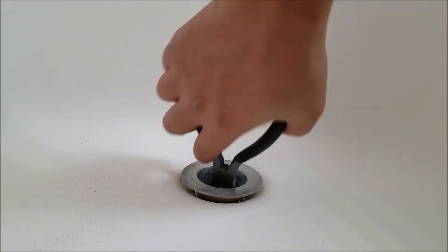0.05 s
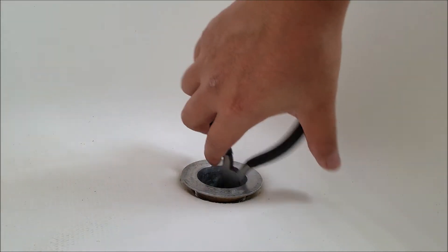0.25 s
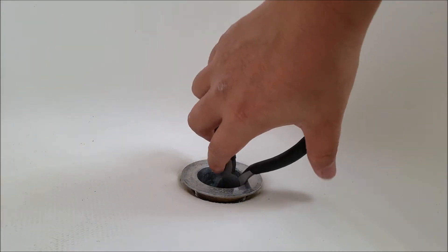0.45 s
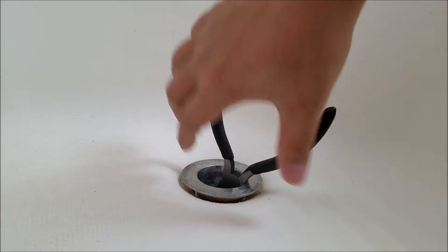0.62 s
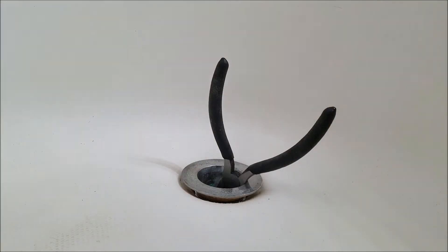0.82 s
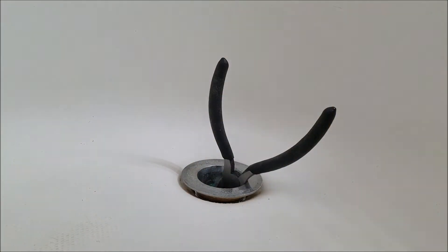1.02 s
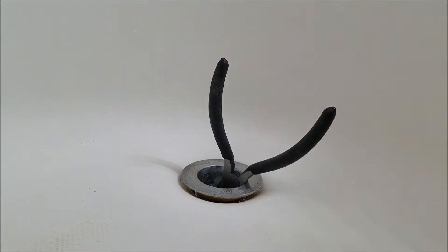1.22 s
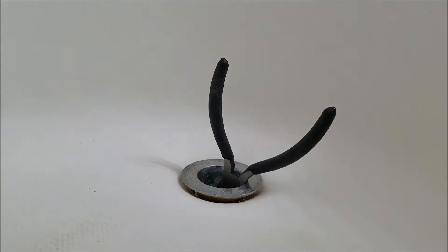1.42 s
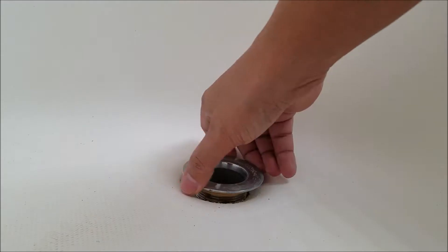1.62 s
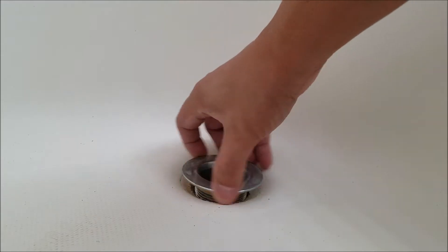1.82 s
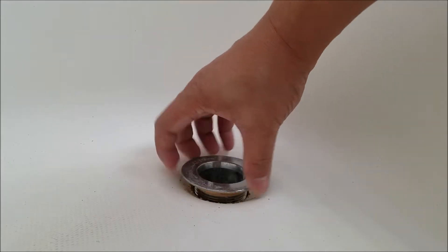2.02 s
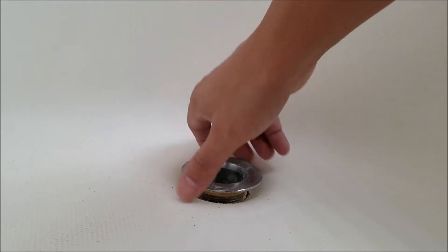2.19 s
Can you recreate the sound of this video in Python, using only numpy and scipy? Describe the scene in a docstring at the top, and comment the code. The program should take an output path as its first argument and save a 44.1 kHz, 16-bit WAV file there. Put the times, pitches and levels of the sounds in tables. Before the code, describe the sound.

Pliers clunk into a metal bathtub drain, then the loose flange scrapes softly as it turns.

```python
"""A small, hard bathroom, with a close pair of microphones at the tub. Pliers drop into the metal drain:
steel ticks and rings on steel, and each blow makes the hollow tub boom. Light taps, soft bumps and a
dull rumble follow as the hand and pliers shift. Then the hand turns the loose drain flange, whose tiny
slips in the thread scrape softly and ring pipe and tub. Behind it all, arm rustle and quiet room tone."""
import sys
import numpy as np
from scipy import signal
from scipy.fft import rfft, irfft
from scipy.io import wavfile

SR = 44100
rng = np.random.default_rng(int(sys.argv[2]) if len(sys.argv) > 2 else 0)


def unload_wav(signal):
    """Save mono or channel-first audio to the path in sys.argv[1] as 16-bit WAV at rate SR, clipped to [-1, 1]."""
    wavfile.write(
        sys.argv[1],
        SR,
        np.round(np.clip(np.atleast_2d(signal).T, -1, 1) * 32767).astype(np.int16),
    )


N = 103635

# Modes of the tub when rubbed. Each row: pitch in Hz, relative level in dB, t60 in seconds.
DRONE_MODES = [(158.2, -5, 0.37), (267.5, -2, 0.38), (342.3, -6.5, 0.22)]


def pliers(crack_s=0.0018, rise_s=0.0003):
    """Steel on steel: light contacts mostly tick, firm ones also ring the pliers and the flange."""
    # Each row: start in seconds, then level, tick's treble tilt, tick's room tail and ring trim, in dB.
    clinks = [(0.165, -37, 7, 0, -20), (0.205, -29.5, -4.5, 10.5, -6), (0.2158, -22.5, 4, 3, -18),
              (0.2362, -22.5, 1.5, 4.5, -17), (0.2421, -11, 3.5, -8, -7), (0.2554, -13.5, 0, 4, 1),
              (0.266, -0.5, -1.5, 0.5, 1), (0.2814, -19.5, -3.5, 8, -1.5), (0.3021, -13, -3.5, -4.5, 1.5),
              (0.9692, -34.5, -3, 3.5, -25)]
    # Modes of pliers and flange. Each row: pitch in Hz, relative level in dB, t60 in seconds.
    steel_modes = [(1480, -7, .02), (2130, 0, .032), (2790, 6, .028), (4620, 9, .022), (4620, -6, .15),
                   (4740, -10, .34), (4850, 2, .022), (5010, 7, .02), (5060, -10, .17), (11100, -2, .011),
                   (11600, 0, .012)]
    # Spectrum of the tick. Each row: frequency in Hz, gain in dB.
    crack_colour = [(200, -35.5), (1200, 3), (2150, -3.5), (2450, -6.5), (3100, -6), (4200, -10.5),
                    (4550, 0.5), (5000, 4.5), (5300, -4.5), (8000, -12), (9200, -11), (10000, -16),
                    (11200, -3.5), (12800, -9.5), (16000, -18)]
    out, t = np.zeros((2, N)), np.arange(SR // 2) / SR
    for s, db, tilt_db, wet_db, ring_db in clinks:
        burst = rfft(rng.standard_normal(len(t)) * t * np.exp(-2 * t / crack_s))
        crunch = irfft(burst / (abs(burst) + 1e-12), len(t))[:SR // 100]  # flattened spectrum
        crack = amp(-6) * signal.fftconvolve(crunch, impulse(crack_colour))
        tilt = impulse([(1500, -2 * tilt_db), (12000, tilt_db)], size=256)
        tick = signal.fftconvolve(crack, tilt)
        chime = amp(ring_db - 44) * ring(steel_modes, size=len(t)) * (1 - np.exp(-t / rise_s))
        add(out, s, amp(db) * bathroom(tick, wet_db))
        add(out, s, amp(db) * bathroom(chime, wet_db=-11))
    return out


def tub_knocks():
    """Each blow thuds and rings the hollow tub, some duller, some thinner."""
    # Each row: start in seconds, gain in dB, low-pass and high-pass corners in Hz, thud trim in dB.
    knocks = [(0.2099, 2.5, 347, 225, -1), (.222, 1, 1060, 850, 2), (0.2315, 10, 316, 125, -7.5),
              (0.2718, 6, 970, 68, 0.5), (0.3112, 2.5, 760, 247, -2), (.971, -18.5, 598, 69, -4)]
    # Spectrum of the thud. Each row: frequency in Hz, gain in dB.
    thud_colour = [(30, -34.5), (60, -10), (100, -9.5), (300, -13.5), (1100, -15.5), (2000, -28),
                   (4000, -16.5), (16000, -45)]
    out, ringing = np.zeros((2, N)), tub_boom()
    for s, db, top_hz, low_hz, thud_db in knocks:
        thud = bathroom(amp(4.5 + thud_db) * impulse(thud_colour), wet_db=11.5)[:, :SR]
        dulled = signal.sosfilt(signal.butter(2, top_hz, fs=SR, output="sos"), thud + ringing)
        thinned = signal.sosfilt(signal.butter(2, low_hz, "high", fs=SR, output="sos"), dulled)
        add(out, s, amp(db) * thinned)
    return out


def tub_boom(rise_s=0.0018, spread_s=0.00015):
    """Each pitch of the wide tub's boom reaches one microphone before the other, sides alternating."""
    # Pitches in the tub's boom under the quick run of blows.
    # Each row: pitch in Hz, relative level in dB, t60 in seconds.
    boom_pitches = [(98.2, -1.5, 0.47), (127.8, 3, 0.16), (164, -12.5, 0.84), (206.8, -0.5, 0.29),
                    (259, 1, 0.42), (300.6, 5, 0.11), (362.5, 0, 0.26), (402, -5.5, 0.31),
                    (523.8, -6, 0.34), (598, -10.5, 0.3), (801, -6.5, 0.2), (948.5, -1.5, 0.076)]
    t = np.arange(SR) / SR
    lead = spread_s / 2 * np.array([[-1], [1]])
    ringing = sum(amp(db - 60 * t / t60) * np.sin(2 * np.pi * hz * (t + (-1) ** k * lead))
                  for k, (hz, db, t60) in enumerate(boom_pitches))
    return amp(-37) * ringing * (1 - np.exp(-t / rise_s))


def flange(slips_per_s=3000, spread_db=2):
    """Tiny slips in the thread rasp, ring the hollow drain pipe and set the tub droning."""
    # The turn. Each row: time in seconds, then relative levels of rub, tub drone and pipe ring in dB.
    turn = [(1.57, -91.5, -80.5, -96), (1.63, -71.5, -69, -81.5), (1.69, -69.5, -64, -90),
            (1.78, -71, -63.5, -84.5), (1.855, -62.5, -58, -63.5), (1.90, -72, -53, -64.5),
            (1.955, -78.5, -53.5, -71.5), (2.0, -79, -64.5, -103), (2.05, -99, -87, -99),
            (2.21, -81.5, -69.5, -85), (2.255, -75.5, -69.5, -77.5), (2.35, -69.5, -62, -72)]
    # Spectra of the thread's rub and the tub's drone. Each row: frequency in Hz, relative level in dB.
    rub_colour = [(200, -13), (650, 5), (1100, -2.5), (2000, -4), (2750, -4), (4500, -14.5), (8000, -18),
                  (12000, -20), (16000, -23.5)]
    drone_colour = [(40, -28), (90, 5.5), (160, 5), (270, 0.5), (400, -6.5), (620, -40), (1000, -10.5),
                    (3000, -33.5)]
    # Modes of the pipe under the flange. Each row: pitch in Hz, relative level in dB, t60 in seconds.
    pipe_modes = [(541.5, -4.5, 0.13), (628, 6.5, 0.052), (792, 0, 0.053)]
    # Quick strokes of fingers and thread. Each row: middle and half width in seconds, level in dB.
    swishes = [(1.884, 0.059, -63.5), (2.258, 0.017, -69)]
    # Spectrum of their hiss. Each row: frequency in Hz, relative level in dB.
    hiss_colour = [(1000, -31), (3000, 1), (5500, 0), (8500, -6.5), (12000, -2.5), (16000, -5)]
    t = np.arange(N) / SR
    slips = (rng.random(N) < slips_per_s / SR) * rng.standard_normal(N)
    slips *= amp(spread_db * np.minimum(rng.exponential(1, N), 4))  # a few catch harder
    push = level(turn, column=2)
    rub = unit(colour(slips, rub_colour)) * level(turn)
    rumble = amp(-6.5) * unit(colour(slips, drone_colour)) * push
    drone = amp(-0.5) * resonate(unit(slips) * push, DRONE_MODES)
    pipe = resonate(unit(slips) * level(turn, column=3), pipe_modes)
    scrape = bathroom(rub + rumble + pipe, wet_db=1.5)
    strokes = sum(amp(db) * np.exp(-.5 * ((t - s) / width) ** 2) for s, width, db in swishes)
    return scrape + drone + strokes * coloured_noise(hiss_colour)


def taps():
    """Fingers and metal make damped tocks with one main pitch; the grittier ones are short scratches."""
    # Each row: start in seconds, pitch in Hz, level in dB, swell in seconds, grit from 0 to 1.
    touches = [(0.079, 975, -60, 0.0054, 0.53), (0.208, 327, -37.5, 0.0097, 0.03),
               (0.795, 408, -60.5, 0.0029, 0.28), (0.9722, 382, -48, 0.0031, .35),
               (1.079, 1296, -65, 0.0027, 0.5), (1.802, 1265, -56.5, 0.0056, 1),
               (1.931, 2600, -55.5, 0.00098, 0.82), (2.181, 4710, -70.5, 0.0027, .3)]
    out, t = np.zeros(N), np.arange(SR // 8) / SR
    for s, hz, db, swell_s, grit in touches:
        band = [(hz / 4, -35), (hz / 1.4, -14), (hz, 0), (hz * 0.96, -14), (hz * 4, -40), (SR / 2, -80)]
        scratch = np.sqrt(grit / 2) * unit(colour(rng.standard_normal(len(t)), band))
        tock = np.sqrt(1 - grit) * np.sin(2 * np.pi * hz * t)
        envelope = t / swell_s * np.exp(1 - t / swell_s)
        add(out, s, amp(db) * envelope * (tock + scratch))
    return bathroom(out, wet_db=-1)


def presses(rise_s=0.0058, t60_s=0.42):
    """Low, round bumps of a hand leaning on the tub or rocking the flange."""
    # Each row: start in seconds, pitch in Hz, level in dB.
    bumps = [(0.801, 206, -58), (0.9834, 83, -49.5), (1.9653, 148, -41), (1.9963, 142.2, -43.5)]
    out, t = np.zeros(N), np.arange(SR // 4) / SR
    rise = t / rise_s
    swell = rise * np.exp(1 - rise)
    tail = amp(-8 - 60 * t / t60_s) * np.minimum(rise, 1)
    for s, hz, db in bumps:
        add(out, s, amp(db) * (swell + tail) * np.sin(2 * np.pi * hz * t))
    return out


def shifting():
    """Dull friction of the hand and the settling pliers makes the tub rumble."""
    # Strength of the friction. Each row: time in seconds, relative level in dB.
    friction = [(0, -71), (.06, -62), (.105, -48), (.135, -56), (.18, -55), (.47, -73), (.52, -52.5),
                (.56, -54.5), (.62, -77), (.96, -83.5), (.985, -52), (1.07, -61), (1.12, -58),
                (1.18, -56.5), (1.24, -69.5), (1.33, -90.5)]
    # Spectrum of the rumble. Each row: frequency in Hz, relative level in dB.
    rumble_colour = [(30, -12), (60, -19), (90, 3), (120, -8.5), (158, 2.5), (215, 4), (265, 4), (320, -13),
                     (450, -16.5), (700, -17), (1500, -36), (5000, -56)]
    force = level(friction)
    drone = resonate(force * rng.standard_normal(N), DRONE_MODES)
    return amp(-0.5) * force * coloured_noise(rumble_colour) + amp(-6) * drone


def background():
    """Quiet room tone and the soft rustle of the moving arm."""
    # The arm's rustle. Each row: time in seconds, level in dB.
    rustle = [(0, -69), (.18, -74), (.54, -65.5), (.77, -74.5), (.83, -71), (.98, -65.5), (1.12, -65.5),
              (1.24, -74.5), (1.5, -100)]
    # Spectra of room tone and rustle. Each row: frequency in Hz, relative level in dB.
    room_colour = [(20, -21.5), (40, -5.5), (90, -2), (160, -16.5), (500, -20.5), (900, -24), (4000, -32),
                   (7000, -39), (10000, -38.5), (15500, -30)]
    rustle_colour = [(100, 12.5), (600, -2.5), (1500, -5.5), (3200, -7), (7000, -16), (11000, -14.5),
                     (16000, -14)]
    return amp(-68) * coloured_noise(room_colour) + level(rustle) * coloured_noise(rustle_colour)


def bathroom(x, wet_db, build_s=0.0023):
    """Close reflections, then a diffuse tail that dies faster in the treble."""
    # Decay of the room. Each row: frequency in Hz, t60 in seconds.
    decay = [(80, 0.6), (250, 0.63), (700, 0.37), (2000, 0.37), (5000, 0.35), (14000, 0.21)]
    # Direct sound and reflections off the tub walls. Each row: delay in seconds, left gain, right gain.
    paths = [(0, 0.64, 1), (.0017, 0.052, 0.12), (.0039, 0.33, 0.04)]
    hz, t, spectra = signal.stft(diffuse_noise(SR), SR, nperseg=256)
    response = signal.istft(spectra * amp(-60 * t / read(decay, hz)[:, None]), SR)[1]
    response *= 1 - np.exp(-np.arange(response.shape[1]) / SR / build_s)
    response *= amp(wet_db) / np.linalg.norm(response[0])
    for s, left, right in paths:
        add(response, s, np.array([[left], [right]]))
    return signal.fftconvolve(x[None], response, axes=1)[:, :N]


def diffuse_noise(size):
    """Diffuse noise at two close microphones, nearly alike in the bass."""
    # Each row: frequency in Hz, left-right correlation.
    correlation = [(30, 0.95), (200, 0.93), (400, 0.23), (800, 0.067), (1400, -0.14), (14000, -0.096)]
    a, b = rfft(rng.standard_normal((2, size)))
    alike = read(correlation, np.fft.rfftfreq(size, 1 / SR))
    mid, side = a * np.sqrt((1 + alike) / 2), b * np.sqrt((1 - alike) / 2)
    return irfft(np.array([mid + side, mid - side]), size)


def coloured_noise(points):
    """Diffuse noise with the given spectrum, at rms 1."""
    return unit(colour(diffuse_noise(N), points))


def ring(modes, size=SR):
    """Dying sines of a struck object."""
    t = np.arange(size) / SR
    return sum(amp(db - 60 * t / t60) * np.sin(2 * np.pi * hz * t) for hz, db, t60 in modes)


def resonate(force, modes):
    """A continuous force drives an object's modes."""
    response = ring(modes)
    return signal.fftconvolve(force, response / np.linalg.norm(response))[:N]


def impulse(points, size=4096):
    """A causal click with the given spectrum."""
    log_gain = np.log(amp(read(points, abs(np.fft.fftfreq(size, 1 / SR)))))
    minimum_phase = np.exp(np.conj(signal.hilbert(log_gain)))
    return np.fft.ifft(minimum_phase).real[:size // 2]


def colour(x, points):
    """Filters by a spectrum."""
    size = x.shape[-1]
    return irfft(rfft(x) * amp(read(points, np.fft.rfftfreq(size, 1 / SR))), size)


def read(points, hz):
    """Reads a table on a log-frequency axis."""
    f, value = np.transpose(points)
    return np.interp(np.log(hz + 1), np.log(f + 1), value)


def level(rows, column=1):
    """One dB column of a curve as a gain per sample."""
    rows = np.array(rows)
    return amp(np.interp(np.arange(N) / SR, rows[:, 0], rows[:, column]))


def amp(db):
    """Decibels to gain."""
    return 10 ** (np.asarray(db) / 20)


def unit(x):
    """Scales to rms 1."""
    return x / np.sqrt(np.mean(x ** 2) + 1e-20)


def add(mix, s, sound):
    """Mixes a sound in at s seconds."""
    part = mix[..., max(round(s * SR), 0):][..., :sound.shape[-1]]
    part += sound[..., :part.shape[-1]]


def scene():
    """All sources at the two microphones."""
    return tub_knocks() + pliers() + taps() + presses() + shifting() + flange() + background()


def record(dry, edge_hz=15900):
    """The two microphone ports colour the sound differently, and the highest treble is cut."""
    # Each row: frequency in Hz, dB added on the left and taken from the right.
    ports = [(100, 0.6), (300, -1), (450, -2), (700, 0.67), (15000, 0.2)]
    left = colour(dry[0], ports)
    right = colour(dry[1], [(hz, -db) for hz, db in ports])
    lowpass = signal.firwin(511, edge_hz, window=("kaiser", 9), fs=SR)
    return signal.oaconvolve(np.array([left, right]), lowpass[None], "same")


dry = scene()
out = record(dry)
unload_wav(out)
```